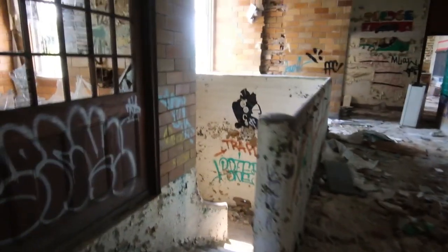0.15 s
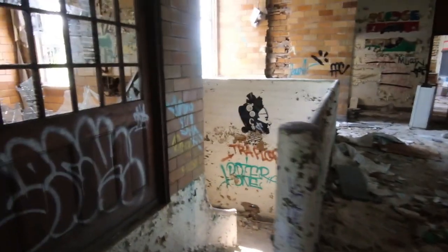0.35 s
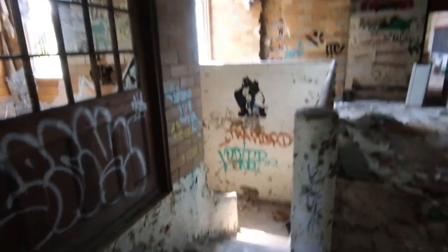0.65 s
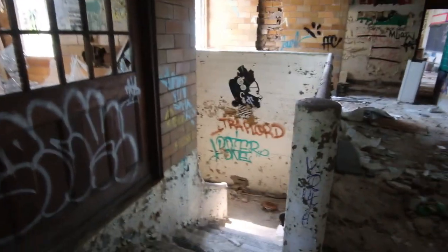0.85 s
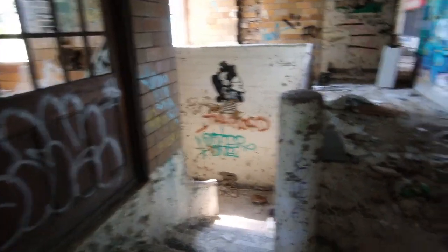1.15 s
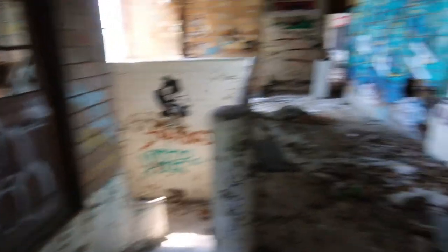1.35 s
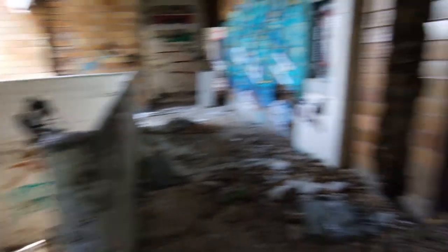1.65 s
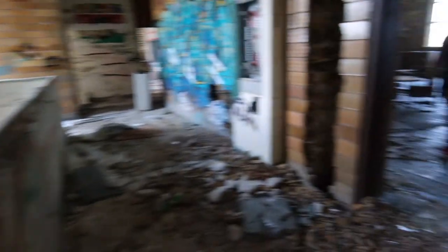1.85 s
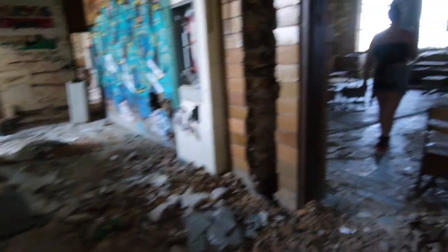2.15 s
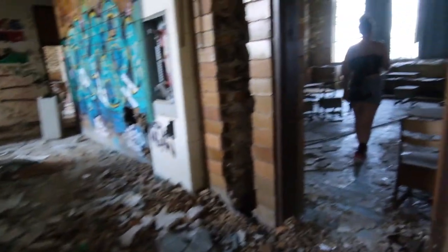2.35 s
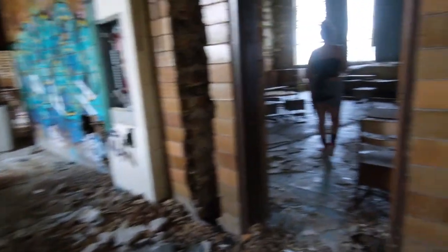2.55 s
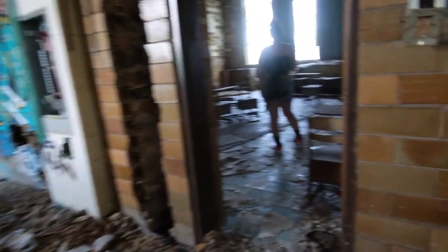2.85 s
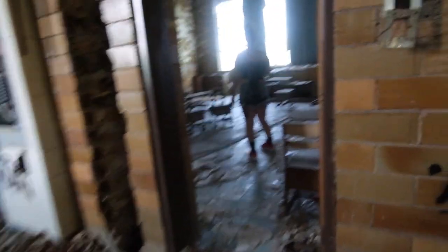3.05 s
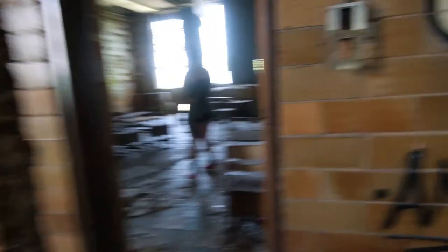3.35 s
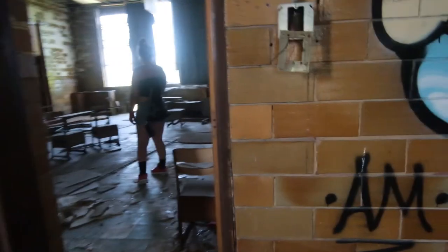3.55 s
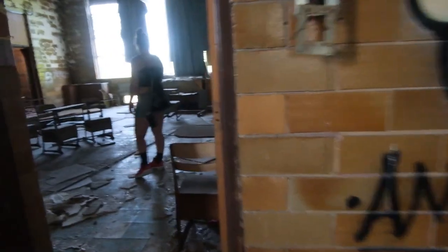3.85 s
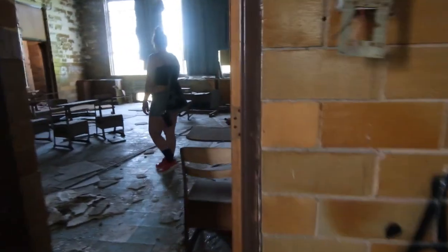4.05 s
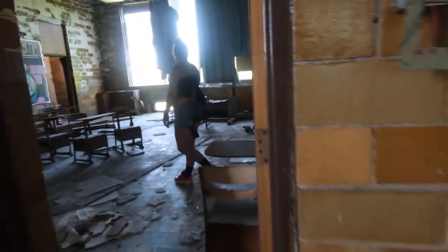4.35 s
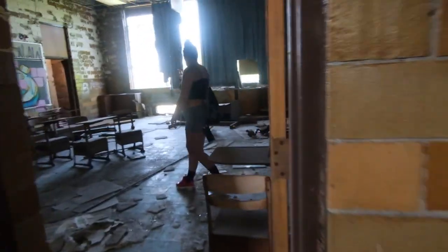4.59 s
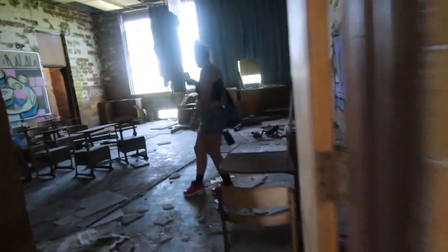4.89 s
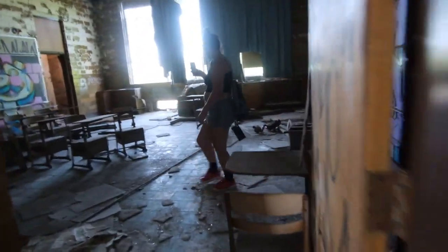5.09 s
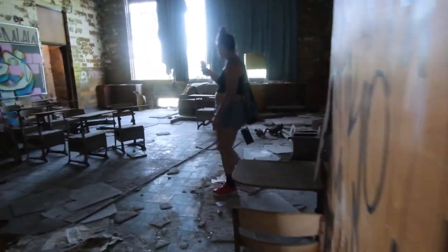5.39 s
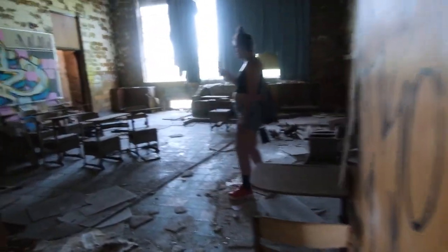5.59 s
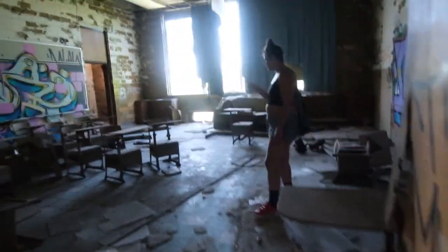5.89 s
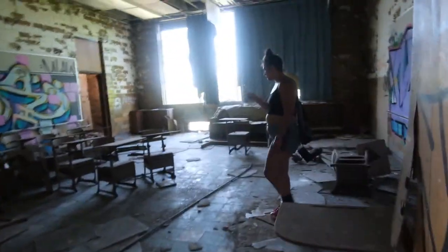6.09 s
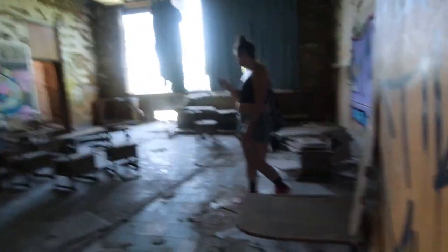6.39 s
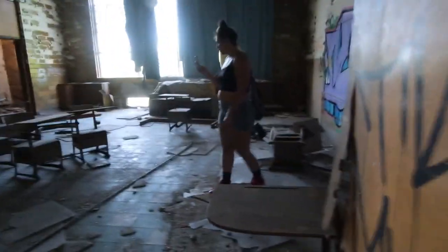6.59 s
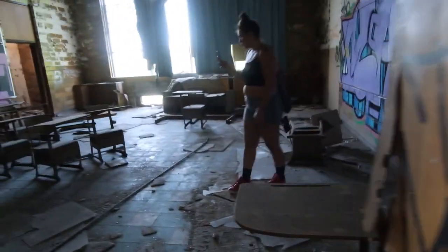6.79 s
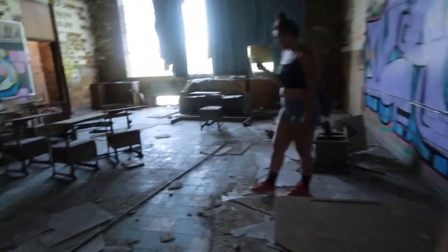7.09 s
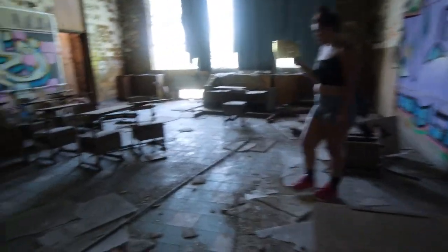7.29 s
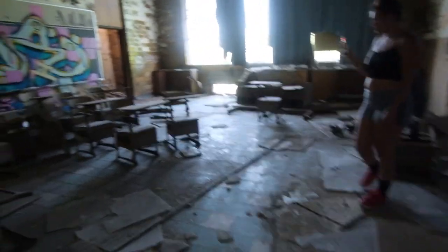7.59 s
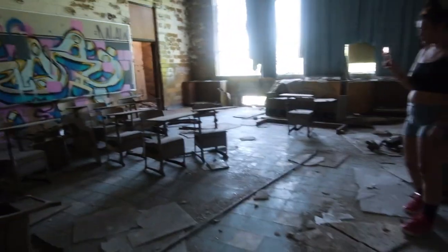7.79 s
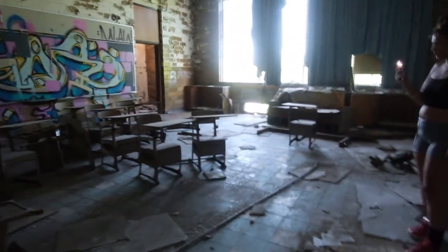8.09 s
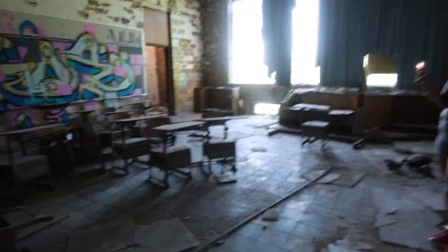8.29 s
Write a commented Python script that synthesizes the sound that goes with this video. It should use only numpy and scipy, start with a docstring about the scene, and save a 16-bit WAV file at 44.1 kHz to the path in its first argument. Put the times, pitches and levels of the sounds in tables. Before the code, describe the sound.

Shoes crunch softly over grit and broken tiles in a bare, abandoned brick building, with small snaps and a few dull heel thuds on boards in the first two seconds. From about 3 seconds the cracks come thicker and sharper. Around 5 seconds the steps grow louder: tile edges squeak briefly, loose bits of glass clink and a heel thuds at about 5.4 seconds. Just after 6 seconds a glass bottle is kicked; it scrapes and rings unevenly until nearly 7 seconds amid loud crunching. After a short lull, heavy crackling steps return at about 7.7 seconds, with the loudest crack just before 8 and a last tile knock near 8.4. The rooms give everything a short echo. Throughout, a hand-held camera adds steady hiss, lumpy low rumble and a faint high whir once a second.

```python
"""Shoes crunch over grit and broken tiles in a bare brick building, softly at first; heels thud on boards.
From about 5 seconds the steps grow louder, tile edges squeak and loose bits of glass clink.
Just after 6 seconds a glass bottle is kicked, scrapes and rings; near 8 comes the loudest crack.
All along the rooms echo, and a hand-held camera adds hiss, rumble and a faint whir once a second."""
import sys
import numpy as np
from scipy import signal
from scipy.fft import rfft, irfft, next_fast_len
from scipy.io import wavfile
from scipy.ndimage import uniform_filter1d, map_coordinates

SR = 44100
rng = np.random.default_rng(int(sys.argv[2]) if len(sys.argv) > 2 else 0)


def transcribe(u):
    """Save the signal u as a 16-bit wav file named by the first command-line argument.

    u: samples, shape (n,) or (channels, n), limited to [-1, 1]; the rate is SR.
    q: integer samples, one column per channel.
    """
    v = np.clip(np.atleast_2d(u).T, -1, 1)
    q = np.round(v * 32767).astype(np.int16)
    wavfile.write(sys.argv[1], SR, q)


N = 372204


def amp(db):
    """Turn a level in dB into a number to multiply by."""
    return 10 ** (np.asarray(db) / 20)


def unit(x):
    """Scale a signal to an average power of 1."""
    return x / np.sqrt(np.mean(x ** 2) + 1e-20)


def along(points, hz):
    """Read values between (Hz, value) points, spaced by pitch."""
    known_hz, values = np.transpose(points)
    return np.interp(np.log(hz + 1), np.log(known_hz + 1), values)


def wobble(rate):
    """A smooth curve through `rate` random values a second."""
    return map_coordinates(rng.standard_normal(int(N * rate / SR) + 4), [np.arange(N) * rate / SR])


def filtered(x, response):
    """Filter x; `response` gives the gain at each frequency."""
    size = next_fast_len(N + SR // 2)
    return irfft(rfft(x, size) * response(np.fft.rfftfreq(size, 1 / SR)), size)[..., :N]


def resonant(x, bands):
    """Pass x through side-by-side resonances, twice over for steep edges."""
    def one_pass(f):
        return sum((-1) ** k * amp(db / 2) * 1j * f * width / (hz * hz - f * f + 1j * f * width)
                   for k, (hz, width, db) in enumerate(bands))
    return filtered(x, lambda f: one_pass(f) ** 2)


# The tone of the low, middle and high bands. Each row: centre in Hz, width in Hz, level in dB.
LOW_BANDS = [(957, 560, 0), (330, 162, -13)]
MID_BANDS = [(2496, 1830, 0), (3860, 4420, -5), (1457, 1480, -5)]
HIGH_BANDS = [(5340, 2670, 5.5), (11800, 3500, 0), (14840, 4200, -8.5)]
# Tiles and stones crack. Each row: start in seconds, level in dB, ring pitch in Hz, then how much to raise or
# lower the low band, the high band and the echo, in dB.
CRACKS = [(.017, -46, 2720, -26, -28, -7), (.0378, -46, 2370, -21, -29, -10),
          (.2329, -42, 5100, -17, -11, -9), (.3501, -43, 2400, -18, -27, -7),
          (.8986, -47, 2250, -21, -23, -6), (0.1296, -26, 1270, 0, -26, -3),
          (.254, -41.5, 5100, -14, -15, -4), (.2626, -37, 1530, 2.5, -20, -2),
          (.276, -35, 2250, -3, -29, 3), (0.4297, -34, 3400, -12, -7, 2.5), (0.545, -38, 1000, 3, -28, -2),
          (0.6937, -46, 650, 7, -31, -1), (0.8408, -44, 2290, -6, -21, -2),
          (.9179, -42, 2610, -27, -14, -5), (1.1973, -41.5, 920, 4.5, -31, -8),
          (1.4312, -44, 2710, -13, -16, 2), (1.8122, -43, 3080, -8, -28, 3),
          (1.979, -42.5, 3000, -4, -16, 2.5), (2.14, -39, 1290, -6, -30, 1),
          (2.2066, -39, 1760, 3.5, -33, 6), (2.2566, -31, 1360, -6.5, -22, -2),
          (2.329, -41.5, 1770, -21, -10, 2), (2.4187, -42, 1240, -13, -28, 3),
          (2.627, -32, 2680, -27, -40, -3.5), (2.833, -20.5, 930, -2, -16.5, -12.5),
          (2.8571, -38, 1050, 5, -21, 6), (2.9427, -28.5, 960, -21, -18, -2),
          (3.0062, -39.5, 974, 1.5, -24, 3), (3.035, -42, 996, -15, -2, -4),
          (3.058, -46.5, 2600, -15, 1, -6), (3.123, -26, 2380, -4, -22, 5.5),
          (3.129, -28, 2470, -1.5, -16, -9), (3.1373, -19, 1090, -15, -13.5, -3.5),
          (3.142, -23.5, 2680, -5, -9, -15), (3.2333, -29, 2660, -11, -12, -5),
          (3.27, -35, 880, 6, -25, -3), (3.3254, -44, 1020, 5, -15, 1), (3.3552, -31.5, 945, -8, -13, 1),
          (3.477, -29, 3000, -8, -15, -5), (3.5066, -34.5, 2540, -22, -30, 2),
          (3.525, -39, 2960, -25, -27, -13), (3.8336, -40.5, 1120, 3.5, -19, 0),
          (3.847, -37, 2400, -12, -2, -2.5), (3.911, -32.5, 1060, 0.5, -30, -0.5),
          (3.926, -23.5, 4640, -21, -11, -7.5), (3.9905, -21.5, 1350, -8, -20, -7),
          (4.1883, -13, 1240, -33, -17.5, -8), (4.205, -26, 1220, -11, -27, 0),
          (4.2403, -24, 2550, -5.5, -27, 2), (4.252, -36, 2500, -15, -1, -6),
          (4.265, -37, 2500, -15, -2, -5), (4.435, -47, 2680, -12, -2, 0), (4.5017, -43, 1000, -2, -6, 0),
          (4.6085, -33, 1540, -11, -14.5, -4), (4.7272, -35, 3000, -7, -5, -6),
          (4.7773, -45, 1040, -18, -8, -8), (4.791, -33.5, 910, -13, -3.5, -7),
          (4.8545, -33, 1530, -19, -28, -1), (4.894, -31, 3960, -17, -31, -18),
          (4.9475, -27, 3400, -6, -37, -0.5), (4.9706, -30, 935, 4.5, -26, -7),
          (5.0182, -16.5, 934, -23, -25, -11), (5.0233, -25.5, 950, 2, -15, -6),
          (5.0352, -25, 970, -12, -23, -9), (5.059, -32, 3200, -8, -22, 2),
          (5.1082, -23.5, 1160, -3, -39, -8), (5.1172, -30.5, 1220, 3.5, -32, 2),
          (5.1724, -32.5, 3750, -23, -15, -12), (5.207, -25.5, 840, 9.5, -34, -3.5),
          (5.334, -25.5, 1050, 1, -21, -4.5), (5.358, -21, 990, 0, -20, -11),
          (5.4977, -39, 2240, -14, -14, 6), (5.667, -41.5, 931, -18, -0.5, -6),
          (5.7216, -32, 3280, -22, -7.5, -1), (5.739, -30.5, 3660, -27, -30, -8),
          (5.78, -28, 3380, -22, -8.5, 2.5), (5.8018, -14, 2150, -19, -41, 0),
          (5.8142, -2, 1900, -20, -50, -10), (5.9351, -13, 4140, -29, -25, -4.5),
          (5.9844, -36, 2890, -16, -9, -5), (6.014, -29, 3100, -12, -18, 9),
          (6.067, -23.5, 3870, -24, -30, 7.5), (6.0805, -27.5, 1120, -13, -12, 3),
          (6.105, -20.5, 1370, -1.5, -19, 0.5), (6.132, -22, 1690, -13, -23, -11.5),
          (6.1452, -18.5, 5240, -12, -25, -12), (6.1636, -18.5, 5100, -18, -26, -17),
          (6.1724, -19, 2800, -19, -27, -8.5), (6.187, -17, 1190, -18, -23, -17),
          (6.2352, -23.5, 2430, -25, -12, -2), (6.2613, -13, 2540, -9, -32, -14.5),
          (6.2672, -7, 3200, -15, -39.5, -19), (6.2718, -7.5, 1140, -13, -37, -6),
          (6.2804, -4, 2720, -18.5, -47.5, -18), (6.394, -21.5, 1160, -4, -35.5, 4),
          (6.4268, -10, 2500, -18, -28, -13), (6.4528, -6.5, 2480, -4.5, -41, -21),
          (6.458, -5, 2400, -10, -31, -9), (6.4751, 1.5, 2180, -22, -24, -18),
          (6.5605, -10.5, 2420, -10, -39, -5), (6.606, -24, 2410, -19, -32, 9),
          (6.6795, -3.5, 2430, -11.5, -45, -6.5), (6.8538, -15.5, 2800, -7, -17, -7),
          (6.8818, -19.5, 1210, -4.5, -25, 3.5), (6.8976, -22, 2470, -13.5, -26, -6),
          (6.9267, -23, 2640, -14, -13, -12), (6.936, -25, 2600, -4, -9, -14),
          (6.956, -27, 2500, -18, -10, -17), (7.0362, -34, 1570, -22, -32, -7),
          (7.077, -30, 2540, -11, -17, 4.5), (7.1408, -17, 1270, -1.5, -21, -8),
          (7.222, -33, 2120, -18, -29, -6), (7.2994, -34, 2200, -20, -41, -1), (7.13, -34, 2880, 0, -25, 3),
          (7.344, -22.5, 2000, -2, -27, -9), (7.446, -40, 2270, -20, -26, -4),
          (7.648, -42, 2340, -5, -18, -1), (7.6609, -18.5, 3490, -11.5, -5, 4.5),
          (7.6651, -14, 960, -35, -13, 6), (7.6744, -18, 3300, -15, -31, 8),
          (7.7658, -10, 2700, -35, -12.5, -1.5), (7.7951, -13, 2740, -23, -11, -8),
          (7.8065, -5, 3500, -15, -8, -5), (7.811, -10, 2860, -11, -10, 4),
          (7.932, 9.5, 3570, -21, -16, -11), (7.9362, -0.5, 2510, -26, -28, -1),
          (8.3631, -8.5, 896, -24, -46, 3), (8.3657, -7.5, 1650, -10, -49, -1.5)]
CRACK_RISE_S, CRACK_FADE_S = 0.000286, 0.018  # a fade time is how long a sound takes to drop 60 dB


def cracks():
    """A crack is a snap, a burst of debris and a short ring; returns direct sound and sound to echo."""
    force = np.zeros((2, 4, N))
    t = np.arange(SR // 10) / SR
    snap = 6 * (np.arange(len(t)) == round(CRACK_RISE_S * SR))
    for start, db, hz, low_db, high_db, echo_db in CRACKS:
        rise = 1 - np.exp(-(t + 1 / SR) / CRACK_RISE_S)
        shape = rise * amp(db - 60 * t / CRACK_FADE_S)
        ragged = rng.standard_normal((3, len(t))) + snap
        burst = shape * ragged * amp([[low_db + 13.5], [2.5], [high_db + 2.5]])
        burst[2] *= 0.92 * amp(-60 * t / 0.05)  # the high band dies first
        tone = 0.71 * shape * np.sin(2 * np.pi * hz * t)
        parts = np.vstack([burst, tone])
        add(force[0], start, parts)
        add(force[1], start, parts * amp([[echo_db]] * 3 + [[echo_db - 2.5]]))
    band_sets = (LOW_BANDS, MID_BANDS, HIGH_BANDS)
    debris = sum(resonant(force[:, k], bands) for k, bands in enumerate(band_sets))
    rings = filtered(force[:, 3], lambda hz: (1j * hz / (500 + 1j * hz)) ** 2)  # the rings carry no bass
    return debris + rings


def add(track, start, sound):
    """Mix a sound into a track, `start` seconds in."""
    part = track[..., round(start * SR):round(start * SR) + sound.shape[-1]]
    part += sound[..., :part.shape[-1]]


# A sole presses or drags on grit. Each row: moment of full weight in seconds, seconds held, level in dB, extra
# dB for the low band, extra dB for the high band, graininess from 0 to 1.
SCUFFS = [(0, .03, -66, -23, -25, 0.6), (.17, .08, -68.5, 13, 2.5, 0.8), (.5, .06, -69, -11, -4, 0.4),
          (.7, .05, -69, 11, -17, 0.4), (1.33, .1, -70.5, 6.5, -18, 0.4), (1.6, 0.33, -84, 12, -12, 0.4),
          (2.05, .2, -62, -2, -17, 0.6), (2.43, 0.095, -56, -1, -16, 0.28), (2.6, 0.17, -65, -1, -12, 0.06),
          (2.99, 0.11, -53, -2, -14.5, 0.7), (3.16, 0.16, -55.5, -4.5, -18, 0.8),
          (3.55, 0.072, -69, -8, -1.5, 0.5), (3.9, 0.076, -56, -10, -28, .4),
          (4.26, 0.065, -59, -7, -11, .5), (4.55, 0.18, -62.5, 2, -12, .4),
          (4.76, 0.17, -50, -4.5, -21, 0.25), (5, 0.15, -49, 7.5, -16, 0.15), (5.22, 0.15, -65, 20, -2, 0),
          (5.44, .04, -52.5, -0.5, -16, 0.1), (5.55, 0.18, -56.5, -6, -24, 0.15),
          (5.82, 0.11, -59.5, 13.5, -4, 0.5), (6, .08, -45, -7, -15.5, .3),
          (6.14, 0.084, -34.5, -8, -10.5, 0.37), (6.46, 0.054, -37, -5, -12.5, 0.6),
          (6.66, 0.015, -33, -8.5, -30, 0.43), (6.9, 0.027, -39, -11.5, -18, 0.56),
          (7.04, 0.027, -59, -12, 0, 0.4), (7.18, 0.17, -59.5, 3, -9, 0.3), (7.4, 0.12, -77, 17, -15, 0.4),
          (7.83, 0.029, -24.5, -14.5, -18.5, 0.13), (8, 0.091, -31, -11.5, -17.5, .05),
          (8.13, 0.065, -33.5, -15, -39, 0.13)]
PRESS_DB_PER_S, LIFT_DB_PER_S = 201, 129  # how fast the weight comes on and off


def scuffs():
    """A foot presses, holds and lifts; returns low, middle and high band strength, and graininess."""
    t = np.arange(0, N, 64) / SR
    power, grains = 1e-20, 0
    for pressed, held, db, low_db, treble_db, grainy in SCUFFS:
        press_db = PRESS_DB_PER_S * np.maximum(pressed - t, 0)
        lift_db = LIFT_DB_PER_S * np.maximum(t - pressed - held, 0)
        shape_db = db - press_db - lift_db
        power = power + amp(shape_db + np.array([[low_db], [0], [treble_db]])) ** 2
        grains = grains + grainy * amp(shape_db) ** 2
    return [np.interp(np.arange(N) / SR, t, curve) for curve in (*np.sqrt(power), grains / power[1])]


def grit():
    """Grit rustles under the sole with clumps of tiny breaks; each band breaks at its own moments."""
    *gains, grainy = scuffs()
    clumps = amp((2.0 + 5 * grainy) * wobble(28))
    band_sets = ((LOW_BANDS, 60, .003), (MID_BANDS, 150, .002), (HIGH_BANDS, 250, .001))
    out = 0
    for gain, (bands, breaks_per_s, decay_s) in zip(gains, band_sets):
        hits = rng.random(N) < breaks_per_s / SR
        strength = amp(np.minimum(4 * rng.exponential(size=N), 12))
        breaks = unit(signal.lfilter([1], [1, -np.exp(-1 / (decay_s * SR))], hits * strength))
        roughness = (1 + 2 * grainy * breaks) / (1 + 2 * grainy)
        rub = clumps * roughness * rng.standard_normal(N)
        out = out + gain * unit(resonant(rub, bands))
    return out


# The bottle is struck or rubbed. Each row: start in seconds, level in dB,
# extra dB for the upper tones, rise time in seconds.
BOTTLE_HITS = [(6.259, -10.5, -10.5, 0.0022), (6.28, -26, -1, 0.0022), (6.427, -8.5, -11, 0.0076),
               (6.458, -13, -28, 0.00062), (6.478, -20, 4, 0.0023), (6.489, -2.5, -15.5, 0.0014),
               (6.524, -20, 0, 0.0037), (6.56, -13.5, -5.5, .002), (6.597, -13, -28, 0.0066),
               (6.651, -8.5, -18, 0.018), (6.68, -7.5, -2, 0.00053), (6.703, -9.5, -15, 0.0016),
               (6.735, -15, -5.5, 0.012), (6.755, -15.5, -14, 0.0015), (6.785, -24, -4, 0.0092),
               (6.821, -13, -26, 0.0078), (6.856, -26, -12, .003)]
# A small piece of glass and a shard are knocked. Each row: start in seconds, level in dB.
PIECE_HITS = [(5.8134, -50), (5.9369, -35), (6.0137, -45), (6.0674, -52), (6.1634, -41), (6.2113, -42),
              (6.2637, -31.5), (6.3255, -51), (6.4268, -50)]
SHARD_HITS = [(5.1043, -45), (5.2071, -34)]
# The tones each one rings with. Each row: pitch in Hz, level in dB, fade time in seconds.
BOTTLE_TONES = [(2500, 0, .13), (2545, -16, .16), (3595, -5, .25), (3655, -13, .1), (6240, -24, .6),
                (7520, -29, .35), (10350, -44, .15), (12600, -48, .2)]
PIECE_TONES = [(4400, 9, 0.058), (6520, 6.5, 0.052), (10500, -6.5, 0.13), (13700, -17, .12),
               (15100, -12, 0.13)]
SHARD_TONES = [(3490, 2, .3), (5594, -10, 0.18)]


def glass():
    """A kicked bottle and two loose bits ring; each new contact stifles the bottle's last ring."""
    out = np.zeros(N)
    t = np.arange(SR // 2) / SR
    stops = [hit[0] for hit in BOTTLE_HITS[1:]] + [N / SR]
    for (start, db, upper_db, rise_s), stop in zip(BOTTLE_HITS, stops):
        stifled = amp(db - 60 * np.maximum(start + t - stop, 0) / 0.01)
        add(out, start, stifled * glass_ring(BOTTLE_TONES, rise_s, spread_db=3.3, upper_db=upper_db))
    for hits, tones in ((PIECE_HITS, PIECE_TONES), (SHARD_HITS, SHARD_TONES)):
        for start, db in hits:
            add(out, start, amp(db - 4.5) * glass_ring(tones, rise_s=0.00071, spread_db=0.5))
    return out * amp(2 * wobble(60))  # rolling contact makes the ring waver


def glass_ring(tones, rise_s, spread_db, upper_db=0):
    """One blow sets all the tones ringing, each at a slightly random strength."""
    t = np.arange(SR // 2) / SR
    hz, db, fade_s = np.transpose(tones)[:, :, None]
    is_upper = np.arange(len(tones))[:, None] > 1  # all but the first two
    db = db + upper_db * is_upper + spread_db * rng.standard_normal(db.shape)
    ringing = amp(db - 60 * t / fade_s) * np.sin(2 * np.pi * hz * t)
    return ringing.sum(axis=0) * (1 - np.exp(-t / rise_s))


# Loose tiles are knocked. Each row: start in seconds, level in dB, pitch in Hz, fade time in seconds.
TILE_KNOCKS = [(.13, -27, 1320, .04), (.6945, -40, 680, .04), (1.198, -38, 796, 0.034),
               (2.835, -30, 1037, .18), (3.925, -32.5, 5300, 0.015), (5.023, -25.5, 6020, 0.018),
               (5.035, -28, 3940, 0.019), (6.4741, 5, 2030, 0.0073), (8.364, -20, 898, 0.06)]


def tiles():
    """A knocked tile rings with one clear tone."""
    out = np.zeros(N)
    t = np.arange(SR // 5) / SR
    rise = 1 - np.exp(-t / 0.00023)
    for start, db, hz, fade_s in TILE_KNOCKS:
        add(out, start, amp(db - 60 * t / fade_s) * rise * np.sin(2 * np.pi * hz * t))
    return out


# Heels land on boards. Each row: start in seconds, level in dB, pitch in Hz, extra dB for the echo.
HEEL_THUDS = [(0.789, -41, 200, -12), (1.17, -41, 157, -10), (1.869, -42, 190, -10), (2.06, -43, 150, -8),
              (2.835, -48, 447, -7), (4.606, -39, 364, -6), (5.387, -17.5, 330, -1), (6.383, -30, 154, 1.5),
              (7.931, -24, 180, -8)]


def thuds():
    """A heel gives one low push that dies quickly; returns direct sound and sound to echo."""
    out = np.zeros((2, N))
    t = np.arange(SR // 10) / SR
    rise = 1 - np.exp(-t / 0.0016)
    for start, db, hz, echo_db in HEEL_THUDS:
        thud = amp(db + 3.0 - 60 * t / 0.022) * rise * np.sin(2 * np.pi * hz * t)
        add(out, start, thud * amp([[0], [echo_db]]))
    return out


# Edges slip. Each row: start and length in seconds, first and last pitch in Hz, level in dB.
SQUEAKS = [(5.075, 0.021, 1900, 1800, -31), (5.086, 0.018, 1200, 1100, -28.5),
           (6.408, 0.032, 1200, 1160, -26), (6.14, .032, 4700, 5000, -32)]


def squeaks():
    """An edge slipping on tile sings a short, gliding, unsteady tone."""
    out = np.zeros(N)
    for start, length, first_hz, last_hz, db in SQUEAKS:
        n = round(length * SR)
        phase = 2 * np.pi * np.cumsum(np.linspace(first_hz, last_hz, n)) / SR
        add(out, start, amp(db) * np.hanning(n) ** .5 * np.sin(phase))
    return out * amp(5.5 * wobble(200))


# How long the rooms echo. Each row: frequency in Hz, fade time in seconds.
ECHO_FADES = [(200, 1.24), (800, 0.43), (2500, 0.54), (6000, 0.51), (14000, 0.25)]


def room_echo(x):
    """The walls blur a sound into noise, and each frequency dies away at its own speed."""
    hz, t, spectrum = signal.stft(x, SR, nperseg=256)
    step_s = t[1]
    kept = amp(-120 * step_s / along(ECHO_FADES, hz))  # share of power left after each step
    power = [signal.lfilter([0, 0, 1 - k], [1, -k], np.abs(row) ** 2) for k, row in zip(kept, spectrum)]
    build = np.exp(-step_s / 0.0038)  # reflections take a moment to thicken
    power = signal.lfilter([1 - build], [1, -build], power)
    noise = signal.stft(rng.standard_normal(N), SR, nperseg=256)[2]
    echo = np.sqrt(power) * unit(np.abs(noise)) * np.exp(1j * np.angle(noise))
    return signal.istft(echo, SR, nperseg=256)[1][:N]


def ringing_echo(x):
    """Clear tones keep their pitch as they bounce off the walls in a fading tail."""
    t = np.arange(SR) / SR
    tail = rng.standard_normal(SR) * amp(-60 * t / 0.5) * (t > .01)
    return signal.fftconvolve(x, tail / np.linalg.norm(tail))[:N]


# The tone of the hiss and of the rumble. Each row: frequency in Hz, level in dB.
HISS_TONE = [(59, -22), (100, -4), (135, -4.5), (251, -2.5), (324, -6.5), (418, -8.5), (865, -2.5),
             (1610, -11), (1990, -11.5), (2630, -11), (5920, -24), (15100, -23.5), (16500, -40)]
RUMBLE_TONE = [(7.1, -23), (12, 8), (25, -6.5), (62, -18), (100, -28.5), (151, -35.5), (200, -34),
               (260, -71), (440, -120)]
# Hands shift on the camera. Each row: time in seconds, rumble level in dB.
HANDLING = [(0.0, -50.5), (1.76, -46.5), (3.88, -48), (4.04, -39.5), (4.6, -47), (4.96, -35.5),
            (5.12, -45.5), (5.87, -45), (5.97, -32), (6.04, -48), (6.42, -37), (6.51, -46), (7.03, -40),
            (7.64, -50), (7.9, -44.5), (8.01, -61), (8.23, -38.5), (8.44, -48)]
# The tone of the motor. Each row: centre in Hz, width in Hz, level in dB.
WHIR_BANDS = [(6930, 110, 0), (8080, 98, 5), (8370, 90, 1), (10870, 200, 2), (11360, 200, 2),
              (12230, 120, 1)]


def camera():
    """The amplifier hisses, hands make a lumpy rumble and a small motor whirs briefly every second."""
    t = np.arange(N) / SR
    noise = rng.standard_normal((3, N))
    hiss = amp(-60.5) * unit(filtered(noise[0], lambda hz: amp(along(HISS_TONE, hz))))
    handling_db = np.interp(t, *np.transpose(HANDLING)) + 1.8 * wobble(5.6)
    rumble = amp(handling_db) * unit(filtered(noise[1], lambda hz: amp(along(RUMBLE_TONE, hz))))
    motor_on = (t - .355) % 1 < .21
    running = uniform_filter1d(motor_on * 1., size=400) * amp(4.4 * wobble(40))
    whir = amp(-75) * running * unit(resonant(noise[2], WHIR_BANDS))
    return hiss + rumble + whir


def scene():
    """Mix the steps, the glass, their echo and the camera's own noise into one channel."""
    direct, to_echo = cracks() + thuds() + amp([[0], [-6]]) * (squeaks() + tiles())
    clinks, crunch = glass(), grit()
    echo = room_echo(to_echo + amp(-9.0) * crunch) + amp(-8.0) * ringing_echo(clinks)
    return (direct + clinks + crunch + echo + camera())[None]


def record(dry):
    """The camera turns itself down after loud sounds, rounds off peaks and cuts the highest treble."""
    react_s, top_hz = .08, 16600
    kept = np.exp(-1 / (react_s * SR))
    power = signal.lfilter([1 - kept], [1, -kept], dry ** 2)
    turned_down = dry * (1 + power / amp(-55.5)) ** -.2
    rounded = turned_down / (1 + np.abs(turned_down) ** 8) ** (1 / 8)
    return filtered(rounded, lambda hz: hz < top_hz)


dry = scene()
out = record(dry)
transcribe(out)
```